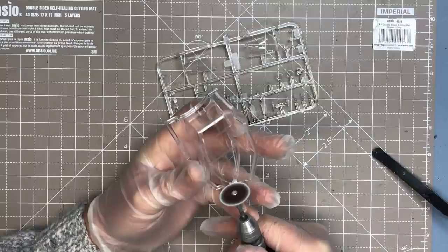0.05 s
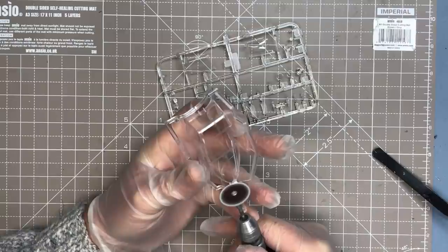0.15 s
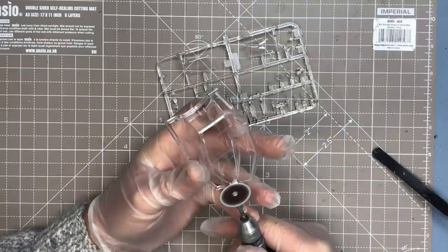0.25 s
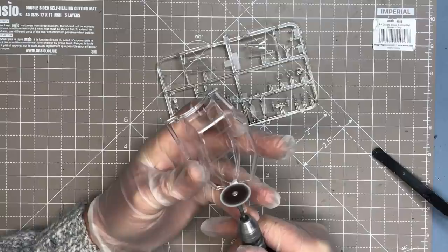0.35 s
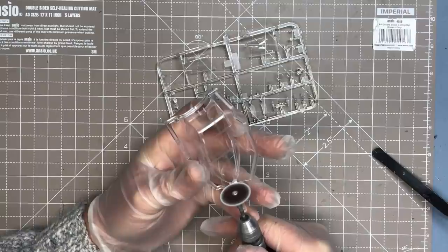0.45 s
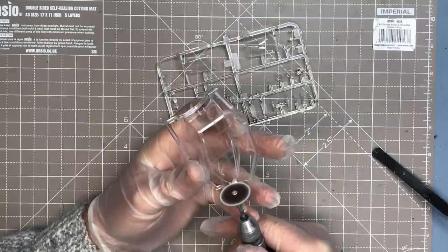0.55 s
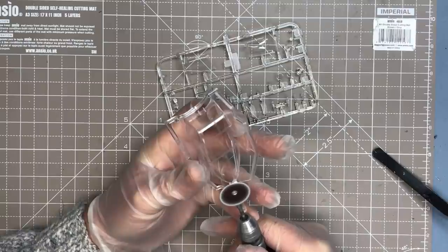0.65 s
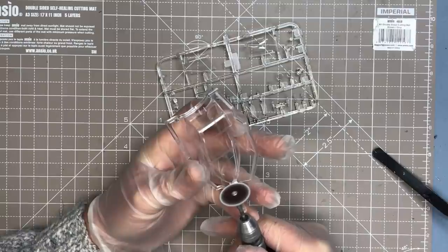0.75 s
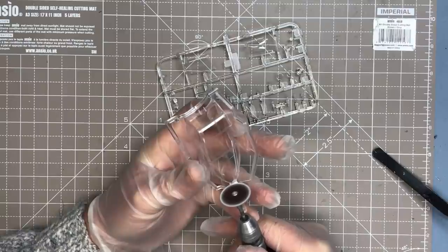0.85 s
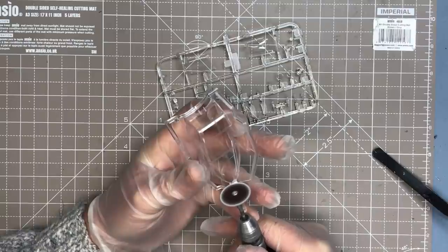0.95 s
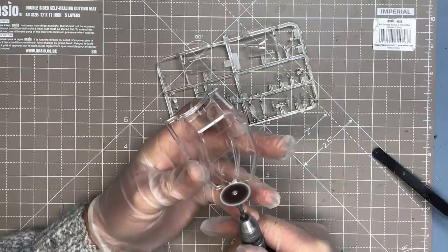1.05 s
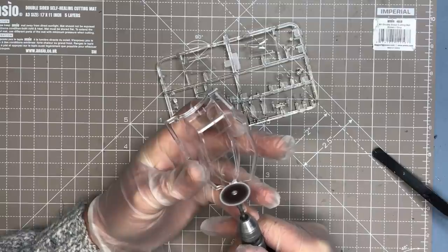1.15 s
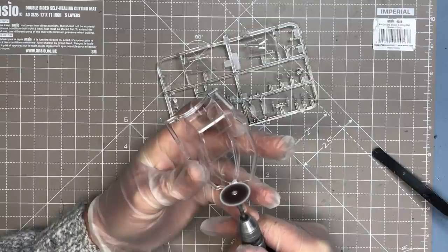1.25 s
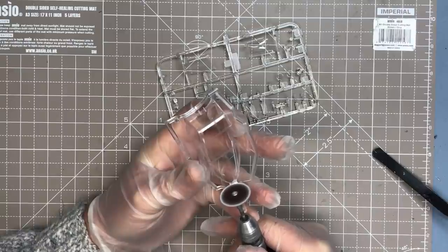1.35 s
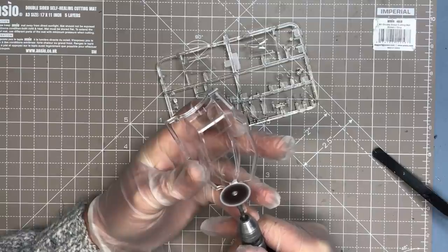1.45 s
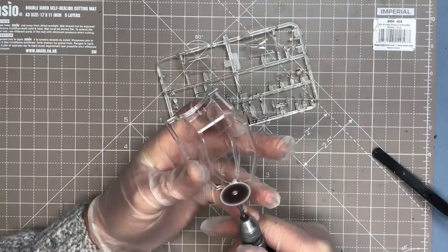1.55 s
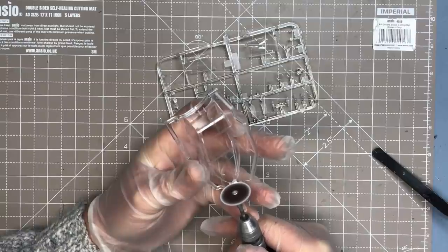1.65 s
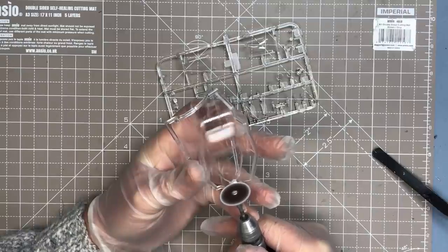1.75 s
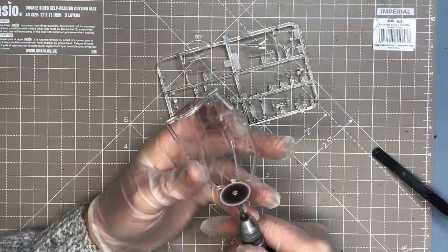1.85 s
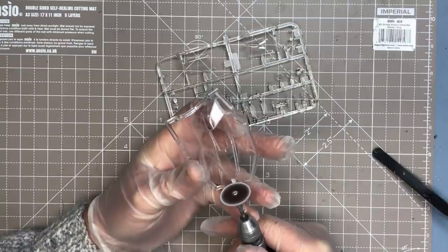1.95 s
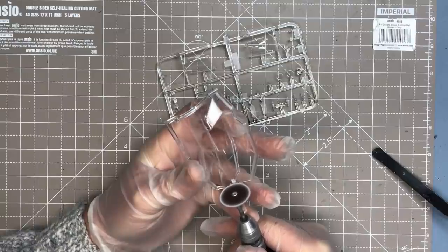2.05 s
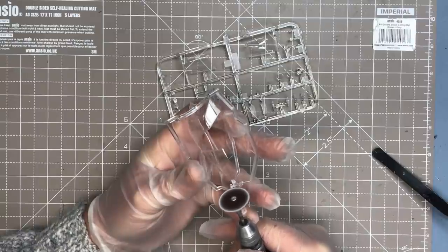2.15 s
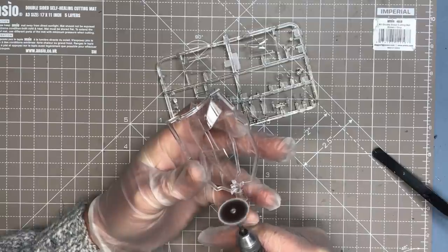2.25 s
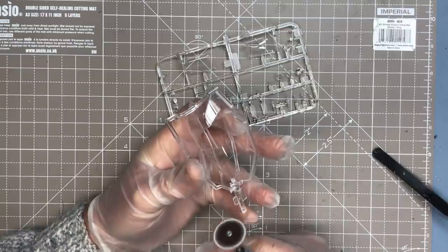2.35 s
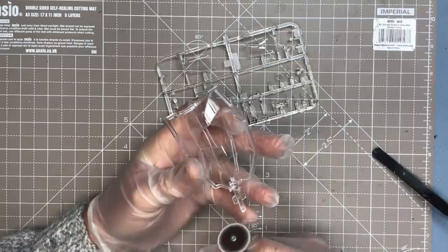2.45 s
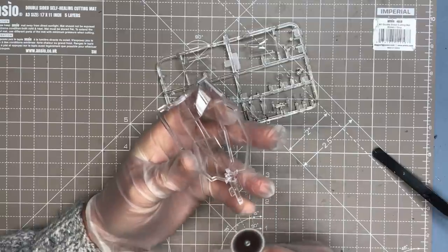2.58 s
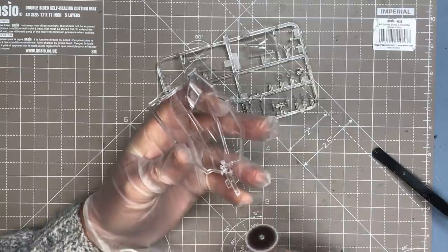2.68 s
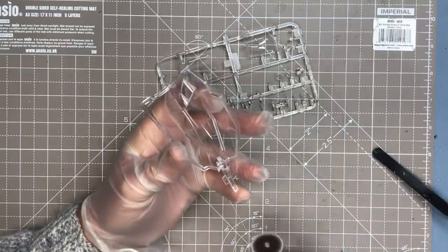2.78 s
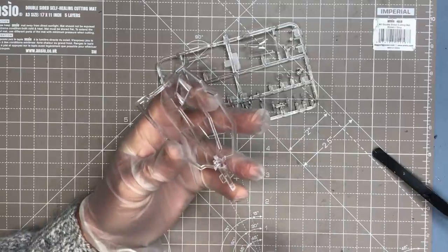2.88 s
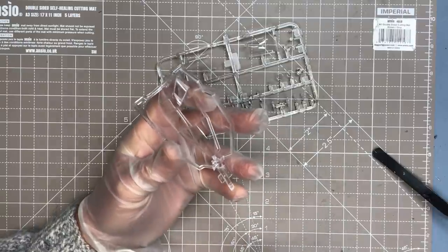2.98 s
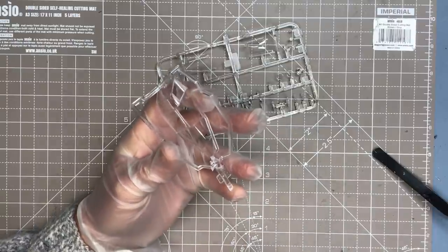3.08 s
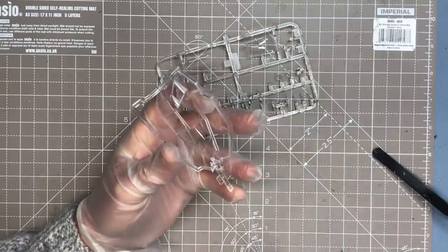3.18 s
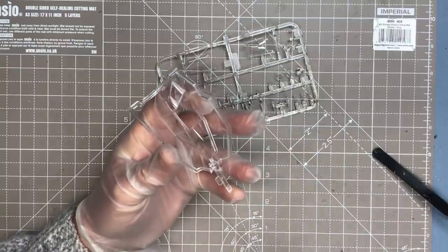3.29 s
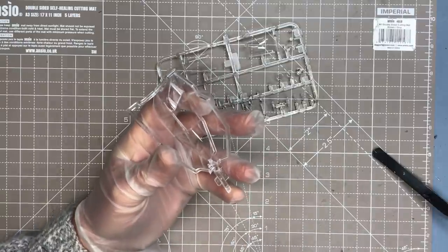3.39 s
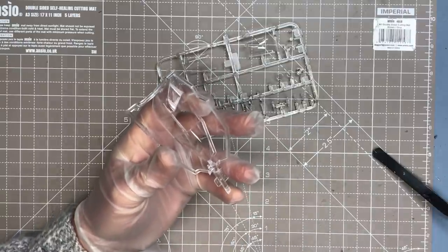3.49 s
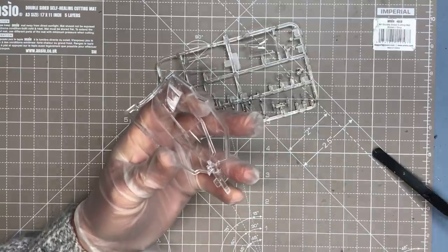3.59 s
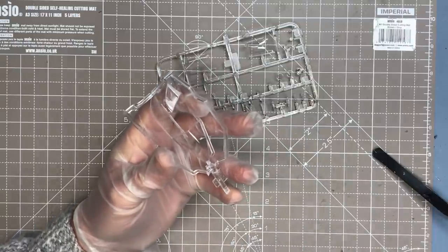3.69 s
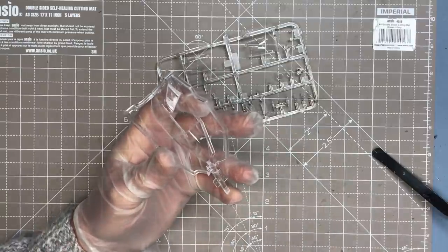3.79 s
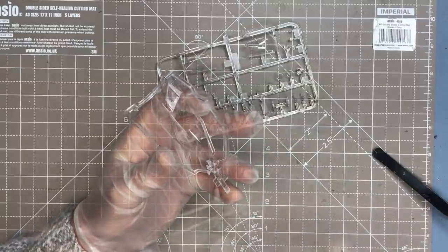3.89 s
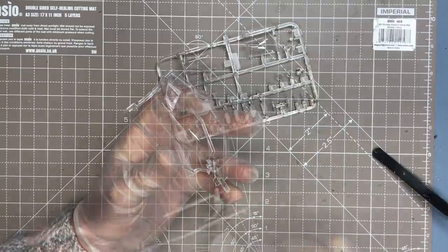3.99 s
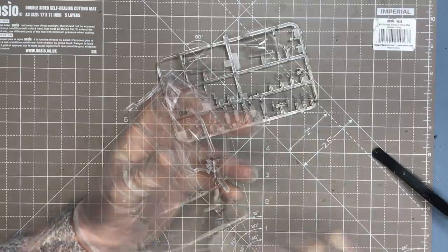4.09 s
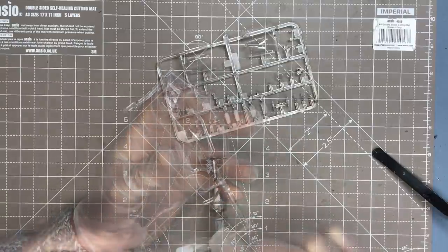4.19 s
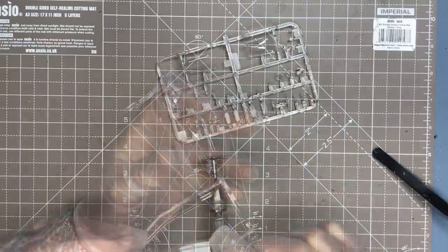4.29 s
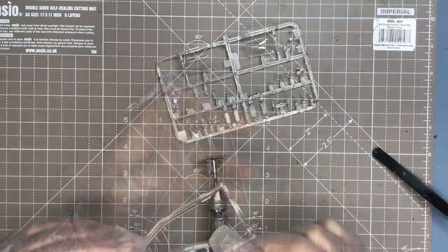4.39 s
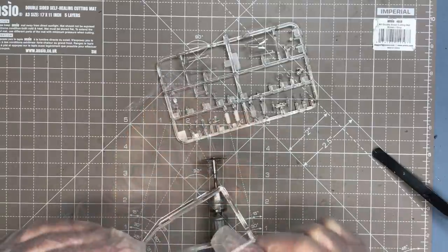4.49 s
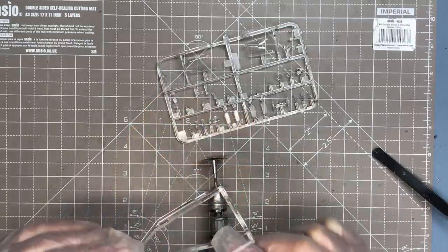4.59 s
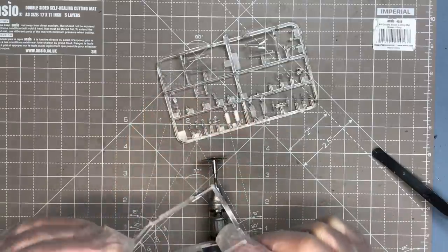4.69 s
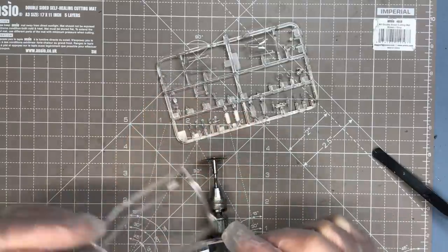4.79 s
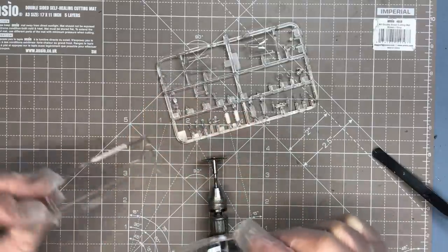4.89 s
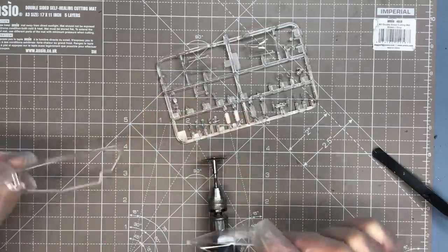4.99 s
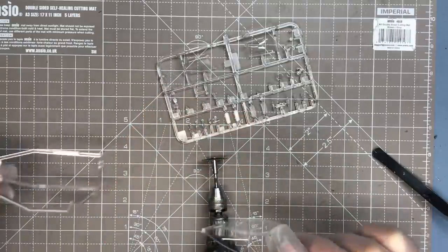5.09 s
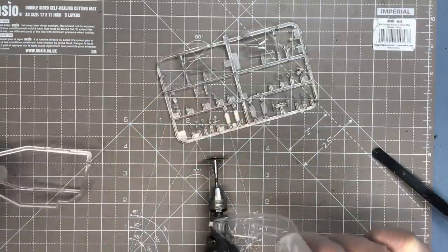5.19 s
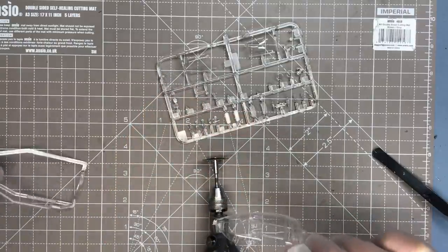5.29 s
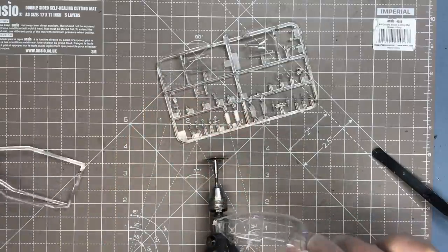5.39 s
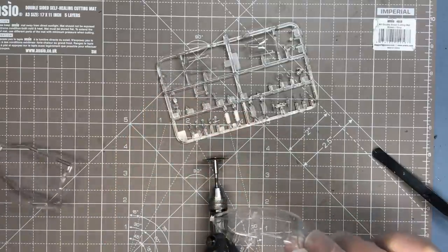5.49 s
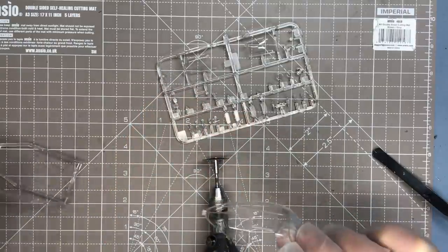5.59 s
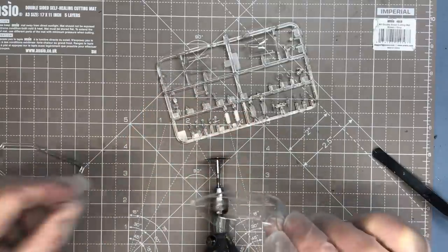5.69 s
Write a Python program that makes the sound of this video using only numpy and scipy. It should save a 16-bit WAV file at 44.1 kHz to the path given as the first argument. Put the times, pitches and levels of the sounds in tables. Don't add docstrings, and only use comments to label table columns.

```python
import sys
import numpy as np
from scipy import signal
from scipy.fft import rfft, irfft, next_fast_len
from scipy.io import wavfile
from scipy.ndimage import uniform_filter1d, map_coordinates

SR = 44100
rng = np.random.default_rng(int(sys.argv[2]) if len(sys.argv) > 2 else 0)


def invert_db(level):
    return 10 ** (np.asarray(level, dtype=float) / 20)


def wav_record(signal):
    frames = np.transpose(np.atleast_2d(signal))
    bounded = np.clip(frames, -1, 1)
    quanta = np.round(bounded * 32767).astype(np.int16)
    wavfile.write(sys.argv[1], SR, quanta)


N = 253131
CUT_S = 4.176
T = np.arange(round(CUT_S * SR)) / SR
CLOCK = np.arange(N) / SR
LIFT_S = 0.035

# touch in seconds, full pressure in seconds,
# let go in seconds, force in dB, thinning of the plastic in dB.
STROKES = [
    (-.1, -0.002, .305, -27.5, -0.5),
    (0.387, 0.566, 0.82, -28, 1),
    (0.974, 1.13, 1.4, -27.5, 5),
    (1.444, 1.672, 1.85, -25.5, 10),
    (1.927, 1.98, 2.078, -22, 20.5),
    (2.13, 2.207, 2.28, -27, 28),
]


def shaft():
    # time in seconds, speed in turns per second.
    loaded_speed = [(-0.014, 188.9), (0.13, 156.8), (0.25, 137.9), (0.505, 181.3), (0.802, 137.4),
                    (1.035, 174.8), (1.299, 133.9), (1.361, 127.6), (1.586, 169.1), (1.866, 137.0),
                    (1.962, 145.7), (2.089, 156.9), (2.184, 177.2), (2.451, 214.8), (2.79, 201.8),
                    (2.87, 195.4), (2.956, 205.5), (3.114, 221.3)]
    idle_hz, run_up_s = 251.25, .687
    s, hz = np.transpose(loaded_speed)
    line = np.array([np.ones_like(s), s])
    bend = np.block([[abs(s[:, None] - s) ** 3, line.T], [line, np.zeros((2, 2))]])
    *c, a, b = np.linalg.solve(bend, np.r_[hz ** 2, 0, 0])
    t = np.minimum(T[::64], s[-1])
    energy = abs(t[:, None] - s) ** 3 @ c + a + b * t
    loaded = np.interp(T, T[::64], np.sqrt(energy))
    speed = idle_hz - (idle_hz - loaded) * np.exp(-np.maximum(T - s[-1], 0) / run_up_s)
    return speed, 2 * np.pi * np.cumsum(speed) / SR


def cutting(angle):
    # centre in Hz, width in Hz, level in dB.
    plastic_modes = [(2052, 300, -7), (2517, 65, -1.5), (2774, 81, 3.5), (3206, 198, -5), (3540, 260, -4)]
    disc_low_modes = [(4400, 330, -1.5), (4633, 55, 11)]
    disc_high_modes = [(5630, 1200, -7.5), (6900, 120, 5), (7500, 810, -6.5), (8500, 500, -0.5),
                       (9400, 490, -4)]
    rim_modes = [(11370, 790, -2.5), (12900, 1120, -5.5), (14620, 900, -10)]
    plastic_db, low_db, high_db, rim_db, whine_db = bite_levels()
    plastic = resonant(beats(angle, rough=.13, sharp=.9, scatter_db=.8), plastic_modes)
    plastic = patchy(plastic, depth_db=3)
    low = resonant(beats(angle - 1.5, rough=.3, sharp=0.36, scatter_db=1), disc_low_modes)
    high = resonant(beats(angle - 1.1, rough=0.92, sharp=0.48, scatter_db=-1.5), disc_high_modes)
    high = patchy(high, depth_db=2.5)

    bite = ((1 + np.cos(angle - .6)) / 2) ** 3.5 + .15
    sing_phase = 2 * np.pi * 11500 * T + 1.5 * wobble(250) + 9 * wobble(25)
    sing = np.sqrt(2) * invert_db(1.7 * wobble(39.6)) * np.sin(sing_phase)
    scrape = patchy(resonant(rng.standard_normal(len(T)), rim_modes), depth_db=2.2)
    rim = unit(bite * (0.92 * sing + scrape))

    strain = invert_db(-21.0 + 2.2 * wobble(4.7)) * np.sin(2 * angle)
    out = invert_db(plastic_db) * plastic + invert_db(0.57 * plastic_db - 14.5) * strain
    out += invert_db(low_db) * low + invert_db(high_db) * high
    out += invert_db(rim_db) * rim + invert_db(whine_db) * tooth_whine(angle) + squeals(angle)
    return out * np.clip((2.27 - T) / 0.058, 0, 1)


def tooth_whine(angle):
    flutter = .5 * wobble(120) + .4 * np.sin(angle)
    whine = (1 + 0.41 * np.cos(angle)) * invert_db(0.81 * wobble(60)) * np.sin(50 * angle + flutter)
    return unit(whine) * np.clip((2.2 - T) / .02, 0, 1)


def squeals(angle):
    # start in seconds, length in seconds, pitch in Hz, level in dB.
    sticks = [
        (0.191, 0.059, 4600, -33.5),
        (1.78, 0.097, 9400, -33),
        (1.857, 0.036, 2767, -40.5),
        (2.006, 0.043, 2106, -42.5),
        (2.026, 0.055, 3677, -33),
        (2.207, 0.038, 3757, -40),
        (2.197, 0.069, 7500, -46),
    ]
    out = np.zeros(len(T))
    for s, length, hz, db in sticks:
        swell = np.sin(np.pi * np.clip((T - s) / length, 0, 1))
        swell = swell * (1 + 0.59 * np.cos(angle)) * invert_db(2.49 * wobble(60))
        out += invert_db(db + 8.0) * swell * np.sin(2 * np.pi * hz * T + 0.54 * wobble(87))
    return out


def bite_levels():
    *_, force, thin = np.transpose(STROKES)
    sag = 29.5 * invert_db(-thin)

    def layer(gain_db, thinning, rest_db, sags, chatter_db):
        peak_db = force + gain_db - thinning * thin
        return chatter_db * wobble(21.97) + pushes(STROKES, peak_db, rest_db, sags * sag, LIFT_S)

    plastic = layer(-.4, 1.026, -50.5, 1.0, 1.9)
    disc_low = layer(-3.0, 1.0, -49, 0.74, 3)
    disc_high = layer(-1.6, 0.22, -41.5, 0.37, 1.3)
    rim = layer(.9, 0.022, -40.5, 1.0, 1.5)
    whine = layer(-2.5, .55, -34, 0.62, 2.6)
    return plastic, disc_low, disc_high, rim, whine


def motor(speed, angle):
    # shaft speed in Hz, hum level in dB.
    cradle = [(125, -42.5), (150, -37), (180, -38), (200, -48), (214, -52.5), (222, -43), (229, -37),
              (240, -40.5)]
    # centre in Hz, width in Hz, level in dB.
    housing_modes = [(700, 470, -4.5), (789, 110, 3.5), (1127, 120, -1.5)]
    # frequency in Hz, density in dB per Hz.
    air_spectrum = [(180, -58.5), (300, -28.5), (477, -8.5), (676, -16.5), (711, -10), (1190, -7.5),
                    (2200, -8), (6780, -7.5), (7370, -5), (15800, -18)]
    # centre in Hz, width in Hz, level in dB.
    fan_modes = [(7500, 1100, 0)]
    loose, away = loosened(), drawn_away()
    *_, thin = np.transpose(STROKES)
    load = pushes(STROKES, invert_db(-.6 * thin), 0, np.full(len(thin), 1.4), LIFT_S)
    hum_db = np.interp(speed, *np.transpose(cradle)) + 3.5 - 9 * away + 1.1 * wobble(12)
    buzz_db = -57 + 13 * load + 13 * loose - 15 * away + 3.4 * (1 - loose) * wobble(14)
    air_db = -48 + 6.5 * load + 5.46 * loose - 3.3 * away + 3.4 * (1 - loose) * wobble(9)

    blows = beats(angle, rough=.03, sharp=.4, scatter_db=.5)
    buzz = filtered(resonant(blows, housing_modes), lambda f: 1 / (1 + (500 / (f + 1)) ** 6))
    buzz = patchy(buzz, depth_db=5.5)
    fan = invert_db(-8) * away * resonant(rng.standard_normal(len(T)), fan_modes)
    air = patchy(noise(air_spectrum, size=len(T)) + fan, depth_db=2)
    spindle, knock_db = loose_spindle(speed, angle, blows)
    body = invert_db(hum_db) * np.sin(angle) + invert_db(buzz_db) * buzz + invert_db(air_db) * air
    return body + spindle + bearing(angle) + jolts(), shaft_orders(angle, knock_db)


def loose_spindle(speed, angle, blows):
    # start in seconds, full in seconds, end in seconds, knock in dB, rattle in dB.
    shudders = [
        (2.24, 2.33, 2.37, -47, -34),
        (2.38, 2.49, 2.58, -32, -38),
        (2.64, 2.779, 2.83, -36.5, -33.5),
        (2.89, 2.972, 2.985, -38.5, -23.5),
        (2.949, 3.08, 3.2, -31, -24.5),
        (3.14, 3.267, 3.36, -39, -35.5),
    ]
    # centre in Hz, width in Hz, level in dB.
    chuck_modes = [(2400, 640, -1.8), (3010, 820, 0.76)]
    spindle_modes = [(4320, 1100, 2.5), (5800, 1300, -6.5)]
    grip_modes = [(1720, 800, 0)]
    settle_s = 0.08
    loose, away = loosened(), drawn_away()
    *_, knocks, rattles = np.transpose(shudders)
    knock_db = pushes(shudders, knocks, -43, np.full(len(knocks), 9.), settle_s) - 11 * away
    rattle_db = pushes(shudders, rattles, -39.0, np.full(len(knocks), 12.), settle_s) - 11 * away

    slow = np.clip((212 - speed) / 8.5, 0, 1) * (1 - ramp(2.9, 3.2))
    skip = 1 + 0.43 * slow * np.cos(angle / 2)
    knock = patchy(resonant(blows, chuck_modes), depth_db=5.5)
    rattle = resonant(skip * beats(angle, rough=.09, sharp=1.5, scatter_db=.3), spindle_modes)
    rattle = patchy(rattle, depth_db=1)
    grip_db = -9.5 + 10.7 * ramp(2.91, 3.37) + 1.7 * wobble(9)
    grip = invert_db(grip_db) * resonant(resonant(blows, grip_modes), grip_modes)
    out = invert_db(knock_db - 3.5) * (knock + grip) + invert_db(rattle_db - 1.06) * rattle
    out = filtered(loose * (1 - away) * out, lambda f: 1 / (1 + (800 / (f + 1)) ** 4))
    return out, knock_db


def shaft_orders(angle, knock_db):
    # multiple of the shaft speed, level in dB.
    free_orders = [(1, 0), (2, -12), (3, -9), (4, -22.5), (5, -7), (6, -9), (7, -12.5), (8, -13), (9, -26),
                   (10, -21.5), (11, -27), (12, -18.5), (13, -16.5), (14, -13)]
    loose_orders = [(1, -6), (2, -21), (3, -3), (4, 2), (5, 0), (6, -10), (7, -7), (8, -5.5), (9, -6.5),
                    (10, -3.5), (11, -3.5), (12, -3), (13, -1.5), (14, -12), (15, 2), (16, -3), (17, -5.5),
                    (18, -14), (19, 5.5), (20, -23), (21, -6)]
    loose, away = loosened(), drawn_away()
    free_db = -60 + 13 * away
    loose_db = -25.5 + 0.41 * knock_db - 7 * ramp(2.71, 2.88) - 30 * away
    free = invert_db(free_db) * tones(free_orders[1:], angle)
    shaking = invert_db(loose_db) * tones(loose_orders[2:], angle + .011 * wobble(45))
    return loose * (free + shaking)


def bearing(angle):
    # multiple of the shaft speed, level in dB.
    ball_tones = [(20.35, -10), (24.42, -9), (26.43, -1), (27.44, -18), (29.52, 2), (30.54, -12.5),
                  (31.33, -1), (31.52, -4), (32.33, -13), (32.52, -10), (33.52, -9), (35.24, -3.5),
                  (37.17, -17), (39.65, -5), (41.68, -13), (43.06, -11), (44.7, -1), (46.55, -2),
                  (51.8, -5), (57, -2)]
    level = invert_db(-67 + 7.8 * ramp(2.3, 2.6) + 2.85 * drawn_away())
    return loosened() * level * tones(ball_tones, angle + .012 * wobble(30))


def jolts():
    # time in seconds, pitch in Hz, level in dB.
    thumps = [
        (1.99, 70, -52),
        (2.334, 200, -39),
        (2.87, 209, -44),
        (3.135, 260, -44),
    ]
    return sum(invert_db(db) * np.exp(-((T - s) / .018) ** 2) * np.sin(2 * np.pi * hz * (T - s))
               for s, hz, db in thumps)


def loosened():
    return ramp(2.144, 2.36)


def drawn_away():
    return ramp(3.394, 3.85)


def hands():
    return taps_and_jingles() + (CLOCK > CUT_S) * gloves()


def taps_and_jingles():
    # time in seconds, peak in dB, body in dB, fizz in dB.
    touches = [(4.5177, -47.5, -10, -13), (4.5244, -50, -13, -9), (4.561, -60.5, -3, -8),
               (5.3536, -41.5, -1, -9), (5.3604, -49, 6.5, -16.5), (5.4468, -53.5, 3, -9.5),
               (5.465, -54, 6, -22), (5.5347, -38, -5, -8), (5.5441, -42.5, -2, -14), (5.5555, -48, -8, -2),
               (5.5951, -51, -4, -2), (5.6241, -44.5, 0.5, -18), (5.6477, -47, -5, -8.5),
               (5.67, -39.5, -0.5, -5.5), (5.6796, -41, -6, -8.5), (5.7125, -48.5, -1, -5),
               (5.722, -40, -8, -13)]
    # pitch in Hz, level in dB, 60 dB decay in seconds.
    part_modes = [(1263, 4.5, 0.038), (1510, 0.5, 0.023), (828, -9, 0.088)]
    # time in seconds, pitch in Hz, level in dB, 60 dB decay in seconds.
    glints = [
        (5.536, 10800, -48.5, 0.089),
        (5.556, 11000, -47, 0.082),
        (5.596, 11050, -52, .12),
        (5.597, 8500, -65, .12),
        (5.672, 12900, -52.5, .15),
        (5.672, 11100, -45, .12),
        (5.676, 8500, -48, 0.14),
        (5.713, 10000, -58, .1),
        (5.723, 12900, -49.5, .12),
    ]
    crack_modes = [(2536, 1800, 1), (5420, 4000, -5.5)]  # Hz, width Hz, dB
    fizz_modes = [(8500, 3000, -1.5), (12500, 4200, -3)]
    out, t = np.zeros(N + SR), np.arange(SR // 10) / SR
    for s, db, body_db, fizz_db in touches:
        body = np.zeros(len(t))
        for hz, level, t60 in part_modes:
            decay = invert_db(level + rng.normal(0, 3) - 60 * t / t60)
            body += decay * np.sin(2 * np.pi * hz * rng.normal(1, .05) * t)
        crack_decay = invert_db(-60 * t / 0.01287) + 0.74 * invert_db(-60 * t / 0.0914)
        crack = resonant(crack_decay * rng.standard_normal(len(t)), crack_modes)
        fizz_decay = invert_db(-60 * t / .01) + 0.17 * invert_db(-60 * t / 0.063)
        fizz = resonant(fizz_decay * rng.standard_normal(len(t)), fizz_modes)
        tap = 0.12 * crack + invert_db(body_db - 3.0) * body + invert_db(fizz_db - 12.0) * fizz
        out[round(s * SR):][:len(t)] += invert_db(db) * tap
    for s, hz, db, t60 in glints:
        out[round(s * SR):][:len(t)] += invert_db(db - 60 * t / t60) * np.sin(2 * np.pi * hz * t)
    return out[:N]


def gloves():
    # time in seconds, activity in dB.
    activity = [(4.18, 0), (4.5, -1.5), (4.7, -6), (5.1, -9), (5.36, -1.5), (5.41, 3), (5.53, 7),
                (5.62, 0.5), (5.74, 5)]
    # frequency in Hz, density in dB per Hz.
    cloth_spectrum = [(1060, -32), (1800, -16), (2170, -17), (2780, -18), (3600, -11), (4650, -19.5),
                      (4900, -22.5), (11700, -30.5), (15000, -44.5)]
    # time in seconds, half length in seconds, level in dB, hiss in dB.
    brushes = [
        (4.307, 0.027, -68, -21),
        (4.463, .05, -81.5, -13),
        (4.998, .03, -75, -1),
        (5.127, 0.053, -69, -3),
        (5.465, 0.0264, -70, -8.5),
    ]
    # time in seconds, half length in seconds, pitch in Hz, level in dB.
    whistles = [
        (4.45, .035, 3880, -75),
        (4.67, .05, 3340, -73),
        (4.85, .03, 3400, -83),
    ]
    activity_db, = curves(activity)
    slide = resonant(rng.standard_normal(N), [(1274, 340, 0)])
    cloth = patchy(noise(cloth_spectrum), depth_db=2.0)
    hiss = noise([(4000, -30), (8000, 0.0), (15000, -11)])
    out = invert_db(-72.5 + 0.68 * activity_db) * cloth
    out += invert_db(-69 + 3 * np.minimum(activity_db, 1.5)) * slide
    for s, half, db, hiss_db in brushes:
        out += invert_db(db) * np.exp(-((CLOCK - s) / half) ** 2) * (cloth + invert_db(hiss_db) * hiss)
    for s, half, hz, db in whistles:
        swell = np.exp(-((CLOCK - s) / half) ** 2) * invert_db(2.0 + 4.3 * wobble(70, CLOCK))
        out += invert_db(db) * swell * np.sin(2 * np.pi * hz * CLOCK + 2.2 * wobble(170, CLOCK))
    return out


def room_tone():
    # frequency in Hz, density in dB per Hz.
    murmur_spectrum = [
        [15, -69],
        [25, -31.5],
        [66, -11],
        [81, -10],
        [102, -3.5],
        [122, -8],
        [155, -3.5],
        [267, -14],
        [405, -17],
        [599, -24],
        [2040, -44.5],
        [2930, -32],
        [12600, -54],
        [16400, -85],
        [22000, -120],
    ]
    hum = invert_db(2.7 * wobble(19, CLOCK)) * np.sin(2 * np.pi * 100 * CLOCK + 0.66 * wobble(16, CLOCK))
    return invert_db(-62.5) * noise(murmur_spectrum) + invert_db(-56 - 2.5 * CLOCK) * hum


def beats(angle, rough, sharp, scatter_db, count=64):
    half = np.sin(angle / 2)
    safe_half = half + 1e-9 * (half >= 0) - 1e-9 * (half < 0)
    blow = np.sin((count + .5) * angle) / safe_half
    grit = np.exp(sharp * np.cos(angle)) * rng.standard_normal(len(T))
    turn = np.round(angle / (2 * np.pi)).astype(int)
    strength = invert_db(scatter_db * rng.standard_normal(turn[-1] + 1))[turn]
    rough = np.clip(rough, 0, 1)
    return strength * (np.sqrt(1 - rough) * unit(blow) + np.sqrt(rough) * unit(grit))


def tones(table, angle):
    a = round(2.15 * SR)
    out = np.zeros(len(T))
    for k, db in table:
        phase = k * angle[a:] + rng.uniform(0, 2 * np.pi)
        out[a:] += invert_db(db + 1.53 * wobble(11, T[a:])) * np.sin(phase)
    return out


def pushes(rows, peak_db, rest_db, sag, release):
    levels = []
    for (a, b, c, *_), db, fall in zip(rows, peak_db, sag):
        levels.append(np.interp(T, [a, b, c, c + release], [rest_db, db, db - fall * (c - b), rest_db]))
    return np.max(levels, axis=0)


def ramp(start, end):
    return np.clip((T - start) / (end - start), 0, 1)


def curves(rows):
    s, *cols = np.transpose(rows)
    return [np.interp(CLOCK, s, c) for c in cols]


def wobble(rate, t=T):
    coarse = t[::32]
    knots = rng.standard_normal(int(N * rate / SR) + 4)
    return np.interp(t, coarse, map_coordinates(knots, [coarse * rate]))


def unit(x):
    return x / np.sqrt(np.mean(x ** 2) + 1e-20)


def filtered(x, response):
    m = next_fast_len(len(x) + 8192)
    return irfft(rfft(x, m) * response(np.fft.rfftfreq(m, 1 / SR)), m)[:len(x)]


def resonant(x, modes):
    def response(f):
        return sum((-1) ** k * invert_db(db) * 1j * f * w / (c * c - f * f + 1j * f * w)
                   for k, (c, w, db) in enumerate(modes))
    return unit(filtered(x, response))


def noise(points, size=N):
    f, db = np.transpose(points)
    white = rng.standard_normal(size)
    return unit(filtered(white, lambda hz: invert_db(np.interp(np.log(hz + 1), np.log(f), db))))


def patchy(x, depth_db):
    z = signal.stft(x, nperseg=256)[2]
    field = uniform_filter1d(rng.standard_normal(z.shape), size=3, axis=0)
    field = uniform_filter1d(uniform_filter1d(field, size=30, axis=1), size=30, axis=1)
    gain = invert_db(depth_db * unit(field))
    even = np.sqrt(np.mean(abs(z * gain) ** 2, axis=0) / np.mean(abs(z) ** 2, axis=0))
    even = uniform_filter1d(even, size=20)
    return signal.istft(z * gain / even, nperseg=256)[1][:len(x)]


def scene():
    # delay in seconds, level in dB.
    walls = [(.0031, -10), (.0058, -13.5), (.0094, -11), (.015, -14.5), (.023, -14.5)]
    speed, angle = shaft()
    body, orders = motor(speed, angle)

    def echoes(f):
        return 1 + sum(invert_db(db) * np.exp(-2j * np.pi * f * s) for s, db in walls)

    tool = filtered(cutting(angle) + body, echoes) + orders
    tool = tool * np.clip((CUT_S - T) / .002, 0, 1)
    return (np.pad(tool, (0, N - len(T))) + hands() + room_tone())[None]


def roll_off(x):
    return signal.sosfilt(signal.butter(12, 16000, fs=SR, output="sos"), x)


def record(dry):
    mix = filtered(dry[0], lambda hz: hz < 15830)[None]
    return roll_off(mix)


dry = scene()
out = record(dry)
wav_record(out)
```